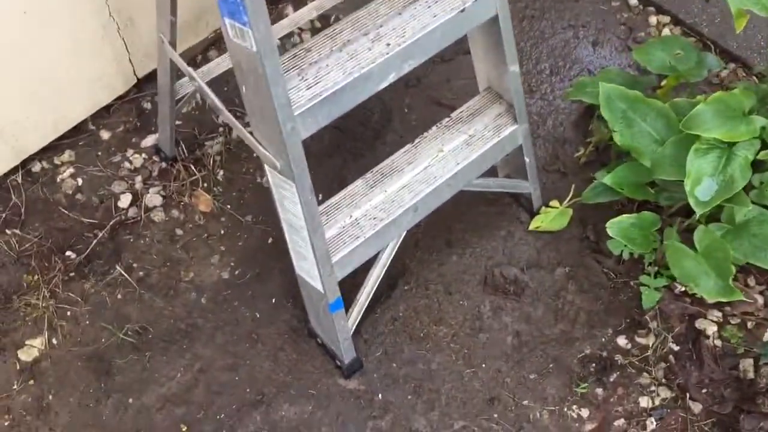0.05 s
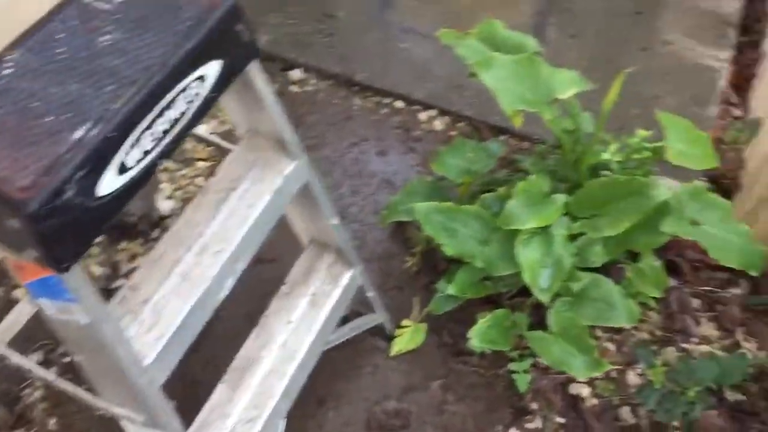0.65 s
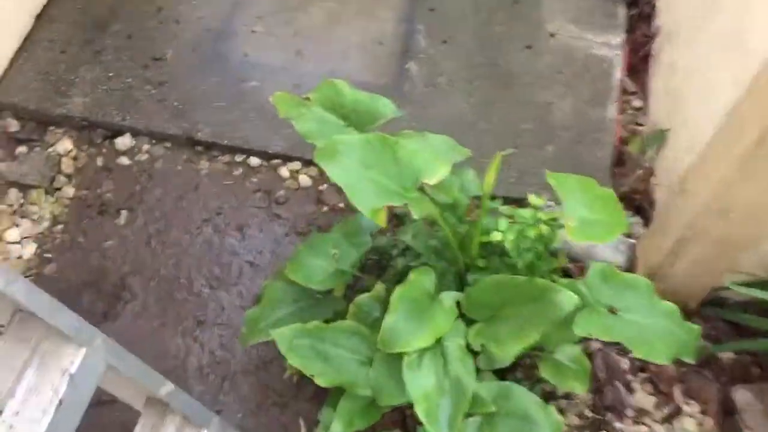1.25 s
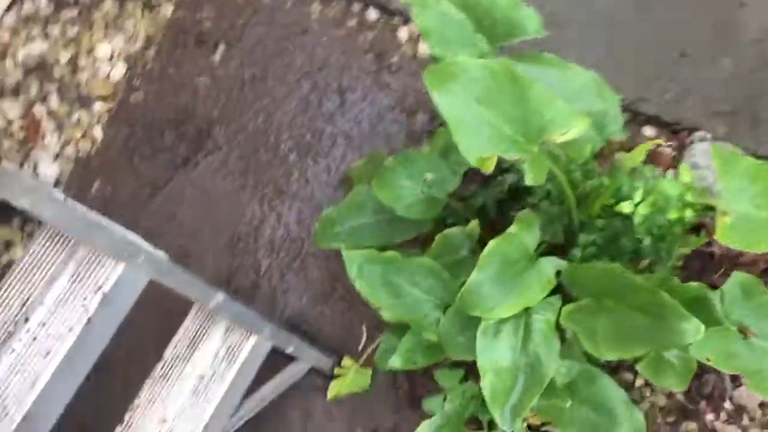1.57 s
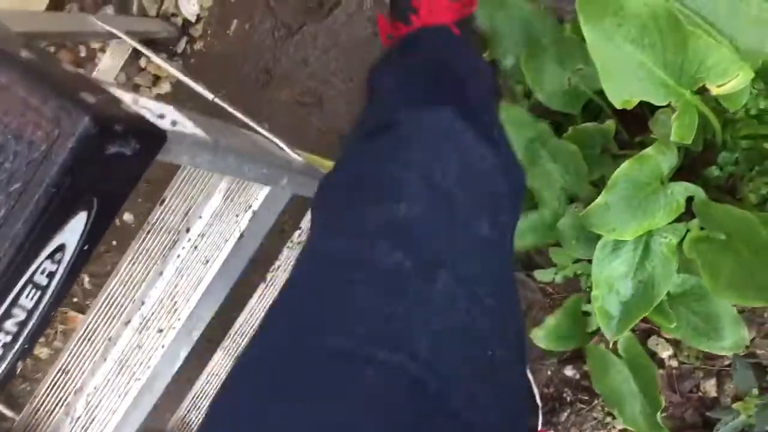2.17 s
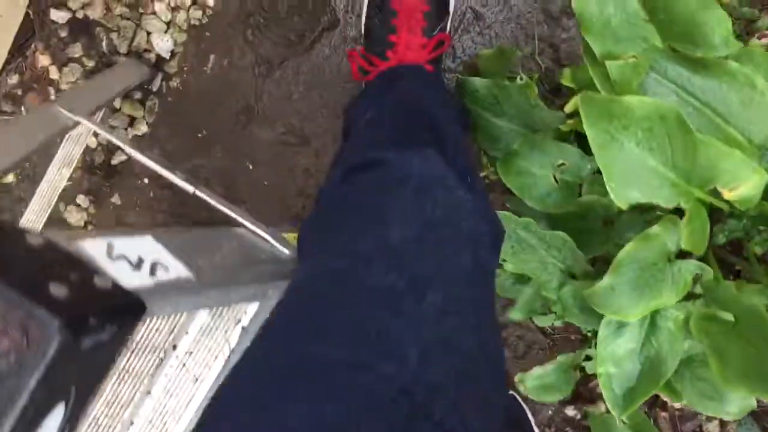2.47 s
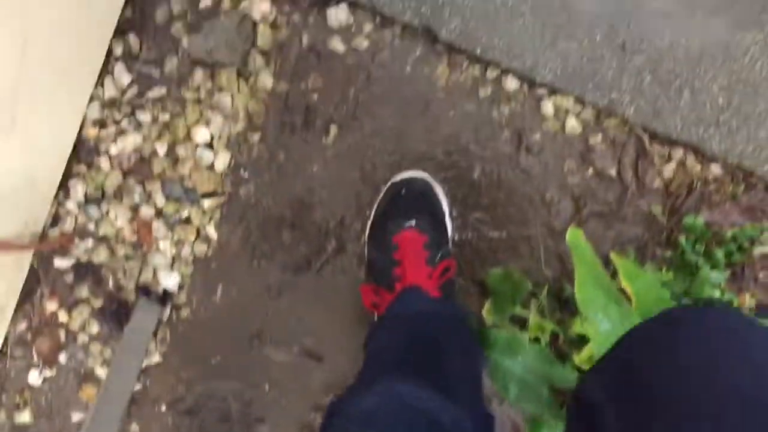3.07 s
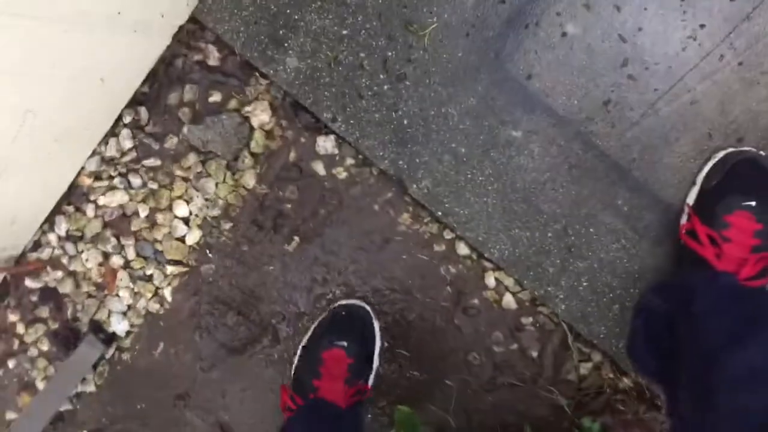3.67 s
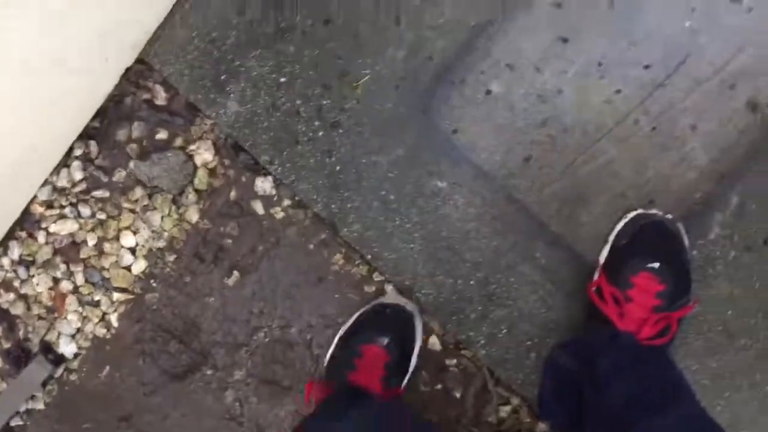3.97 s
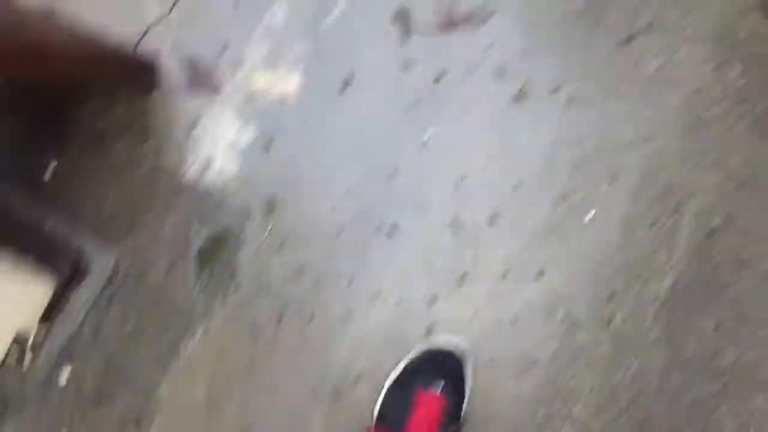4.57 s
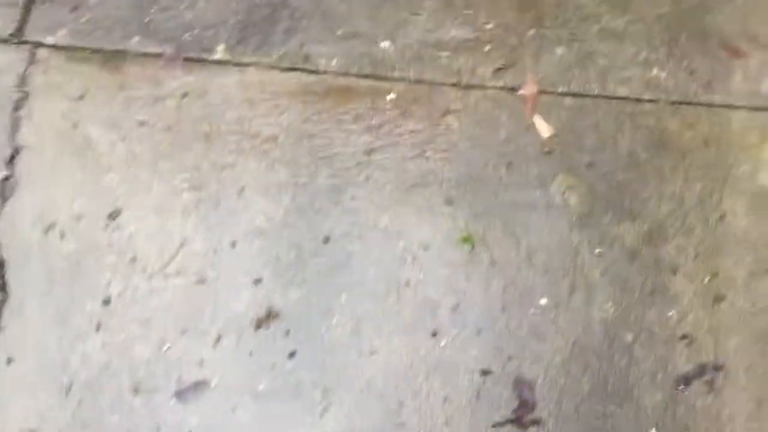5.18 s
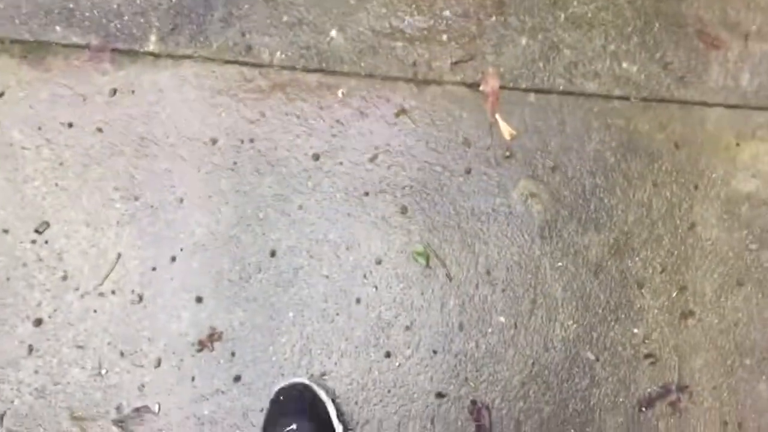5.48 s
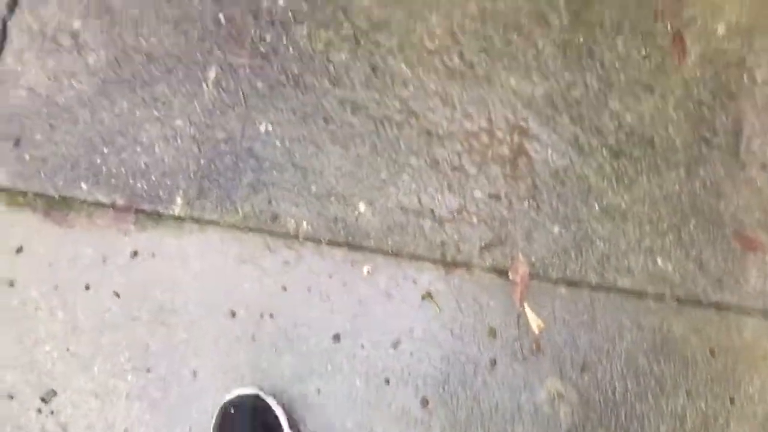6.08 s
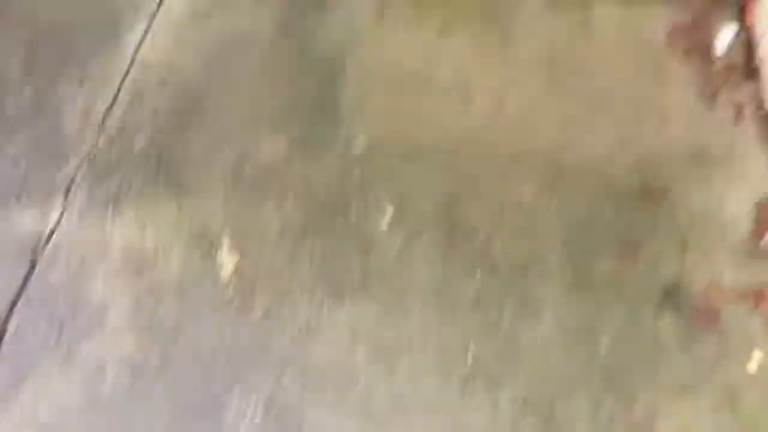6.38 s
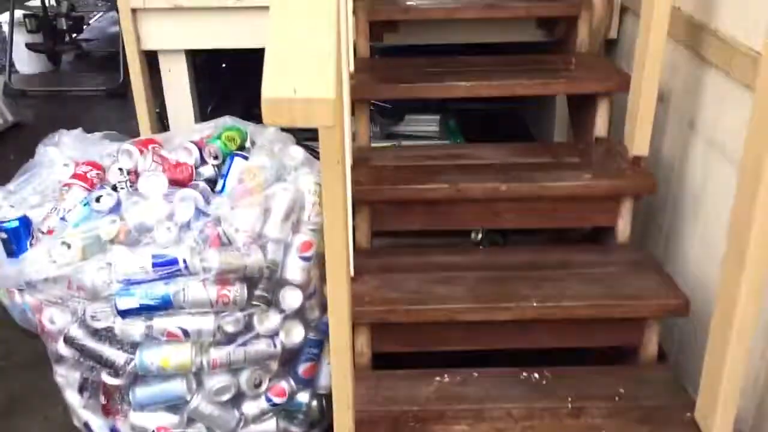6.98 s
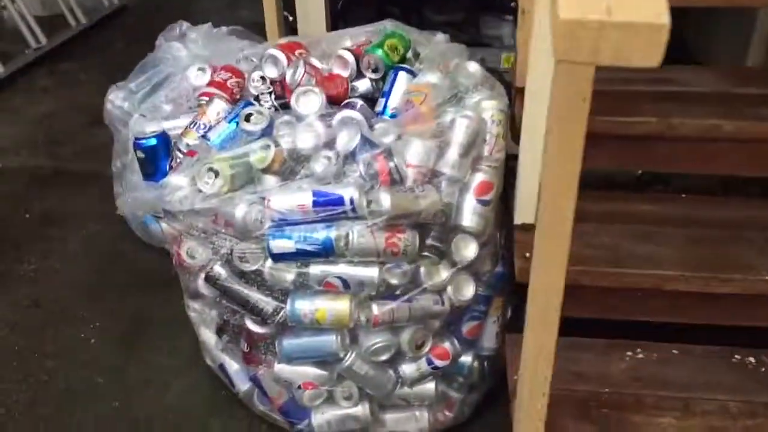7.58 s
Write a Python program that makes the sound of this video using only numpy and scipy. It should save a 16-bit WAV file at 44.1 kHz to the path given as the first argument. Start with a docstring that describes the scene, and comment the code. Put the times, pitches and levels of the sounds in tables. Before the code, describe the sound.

A faint, low hum of distant traffic and engines runs throughout in an outdoor yard. For the first two seconds, close sneakers make very soft scuffs on wet mud, with tiny pebble clicks and light brushing of trousers and leaves. Gentle steps land around 2.1 seconds, and a sharper gritty crunch comes at 2.6. Quieter wet steps, taps and rustles continue until about 3.8, then thin out to faint shuffles, with a tiny squeak near 5.3. The loudest sounds follow: three quick stamps on wet concrete at about 5.4, 5.6 and 6.0 seconds, each a heel smack running into a short, rough scrape with snapping grit, the second scrape the longest. Nearby walls add a brief reflection. Afterwards only soft scuffs remain, with a faint high rasp around 7 seconds and a last light shuffle and small squeak near 7.4.

```python
"""A yard beside a house. Someone in sneakers steps over wet mud and grit, brushing past leaves,
then stamps and scrapes the soles three times on wet concrete. Friction makes a hiss full of tiny
ringing grains; impacts make damped bursts, and pebbles click under the shoes. The walls reflect
the footsteps, and far traffic hums behind it all, with a faint high rasp near the end."""
import sys
import numpy as np
from scipy import signal
from scipy.fft import rfft, irfft, next_fast_len
from scipy.io import wavfile
from scipy.ndimage import uniform_filter1d, map_coordinates

SR = 44100
rng = np.random.default_rng(int(sys.argv[2]) if len(sys.argv) > 2 else 0)


def wrap_up_sound(samples):
    """Save the sound to the file named by the first command line argument, as 16-bit audio."""
    columns = np.atleast_2d(samples).T
    # keep every value between -1 and 1, then stretch to whole-number steps
    tamed = np.clip(columns, -1, 1)
    steps = np.round(tamed * 32767).astype(np.int16)
    wavfile.write(sys.argv[1], SR, steps)


N = 345744

# wet grit squeezed under a sole: start_s, rise_s, length_s, level_db, treble_db
WET_STEPS = [(.14, 0.023, 0.066, -66.5, 31), (1.272, 0.016, 0.08, -55, 13),
             (1.323, 0.0027, 0.0052, -41, 20), (2.572, 0.0026, 0.0037, -42.5, 9),
             (2.586, 0.0018, .02, -44, -5.5), (2.604, 0.01, 0.016, -25, -1.5), (2.64, .005, 0.078, -58, -2),
             (2.745, .002, 0.0072, -35, -1), (3.329, .004, .07, -43.5, -10), (3.41, .003, 0.0056, -47, -3),
             (3.66, .003, 0.032, -62.5, 5.5), (3.695, .006, 0.036, -48, -6),
             (3.739, .002, 0.0067, -40, -0.5), (3.749, 0.003, 0.0077, -37.5, -10)]


def amp(db):
    """Decibels to amplitude ratio."""
    return 10 ** (np.asarray(db) / 20)


def unit(x):
    """Normalisation to rms 1."""
    return x / np.sqrt(np.mean(x ** 2) + 1e-20)


def along(points, hz):
    """Interpolation of (frequency, value) points on a log frequency axis."""
    f, v = np.transpose(points)
    return np.interp(np.log(hz + 1), np.log(f + 1), v)


def hump(hz, centre_hz, slope_db):
    """Band-pass response in dB, its skirts falling by slope_db an octave."""
    return -slope_db * (np.hypot(np.log2((hz + 1) / centre_hz), .5) - .5)


def wobble(rate):
    """Smooth random modulation with rate knots a second."""
    return map_coordinates(rng.standard_normal(int(N * rate / SR) + 4), [np.arange(N) * rate / SR])


def add(track, s, sound):
    """Superposition of a sound on the track at s seconds."""
    part = track[max(round(s * SR), 0):][:len(sound)]
    part += sound[:len(part)]


def colour(x, gain_db, size=4096):
    """Minimum-phase filter with the response gain_db(hz)."""
    cepstrum = irfft(np.log(amp(gain_db(np.fft.rfftfreq(size, 1 / SR))) + 1e-6))
    cepstrum[1:size // 2] *= 2
    cepstrum[size // 2 + 1:] = 0
    return signal.fftconvolve(x, irfft(np.exp(rfft(cepstrum))))[:len(x)]


def patchy(x, depth_db, size):
    """Random modulation band by band; a larger size gives narrower, longer patches."""
    z = signal.stft(x, nperseg=size)[2]
    field = uniform_filter1d(rng.standard_normal(z.shape), size=3, axis=0)
    field = uniform_filter1d(field, size=4, axis=1)
    return unit(signal.istft(z * amp(depth_db * unit(field)), nperseg=size)[1][:len(x)])


def burst(t60_s, gain_db):
    """A damped impact: filtered noise in exponential decay, with peak 1."""
    t = np.arange(SR // 8) / SR
    puff = colour(rng.standard_normal(len(t)) * amp(-60 * t / t60_s), gain_db)
    return puff / np.abs(puff).max()


def drone(swells, hz, waver_db, drift_hz, drift_rate):
    """A randomly modulated tone under Gaussian swells, 10 dB down at rise_s before and fall_s after."""
    t = np.arange(N) / SR
    db = np.max([top_db - 10 * ((t - s) / np.where(t < s, rise_s, fall_s)) ** 2
                 for s, top_db, rise_s, fall_s in swells], axis=0)
    phase = 2 * np.pi * np.cumsum(hz + drift_hz * wobble(drift_rate)) / SR
    return np.sqrt(2) * amp(db + waver_db * wobble(8.2)) * np.sin(phase)


def traffic():
    """Far vehicles sum incoherently to a shifting rumble under a nearly steady wash."""
    # spectra: frequency_hz, level_db
    rumble_spectrum = [(13, -54.5), (22, -10.5), (36, -12), (54, 2), (106, -3), (178, -10), (241, -15.5),
                       (300, -18.5), (390, -35), (660, -120)]
    wash_spectrum = [(150, -22.5), (250, -4.5), (429, -7.5), (586, -6.5), (890, -2), (1140, -3.5),
                     (1420, -7), (2020, -9), (2240, -12.5), (3170, -15), (4990, -21.5), (7570, -25.5),
                     (12300, -30), (13200, -26), (16000, -38.5)]
    # course of the rumble: time_s, level_db
    rumble_levels = [(0, -56.5), (.35, -57), (.9, -59.5), (1.25, -58.5), (1.65, -59), (2.3, -55.5),
                     (3.3, -56.5), (4.5, -57), (5.6, -59), (6.2, -61), (6.7, -58), (7.35, -57), (7.84, -63)]
    rumble_db = np.interp(np.arange(N) / SR, *np.transpose(rumble_levels))
    rumble = patchy(rng.standard_normal(N), depth_db=3.5, size=4096)
    rumble = unit(colour(rumble, lambda hz: along(rumble_spectrum, hz)))
    wash = patchy(rng.standard_normal(N), depth_db=3, size=1024)
    wash = unit(colour(wash, lambda hz: along(wash_spectrum, hz)))
    return (rumble * amp(rumble_db + 2 * wobble(13))
            + wash * amp(-62.5 + .24 * wobble(4.1) + .45 * wobble(25)))


def engines():
    """Periodic firing gives low tones: one engine idles, one climbs as it pulls away, one flutters."""
    # swells of each engine: peak_s, level_db, rise_s, fall_s
    idle_swells = [(3.3, -55, .65, 0.73), (4.95, -52, 1.25, 0.78)]
    leaving_swells = [(.35, -57, .5, 0.3)]
    passing_swells = [(3.65, -60, 0.47, .8)]
    idle = drone(idle_swells, hz=58, waver_db=1.5, drift_hz=1.55, drift_rate=11)
    climbing_hz = 113 + 40 * np.arange(N) / SR
    leaving = drone(leaving_swells, climbing_hz, waver_db=4.5, drift_hz=7.3, drift_rate=34)
    passing = drone(passing_swells, hz=196.3, waver_db=1.5, drift_hz=35, drift_rate=170)
    flutter = unit(amp(4 * wobble(22)))
    return idle + leaving + passing * flutter


def rasp():
    """Fast random frequency modulation spreads two tones into faint, narrow bands of hiss."""
    # swells of each band: peak_s, level_db, rise_s, fall_s
    lower_swells = [(7.0, -63.5, 0.45, 0.1)]
    upper_swells = [(7.02, -65.5, 0.1, 0.063)]
    return (drone(lower_swells, hz=3480, waver_db=0, drift_hz=222, drift_rate=1100)
            + drone(upper_swells, hz=4250, waver_db=1, drift_hz=271, drift_rate=620))


def yard(x, early_db, tail_db):
    """Early reflections off ground and walls, and a diffuse tail; both change as the walker moves."""
    # reverberation time: frequency_hz, t60_s
    decay_times = [(150, 0.26), (1000, 0.28), (3000, 0.41), (8000, 0.33), (15000, 0.61)]
    out, hop = np.zeros(N), SR // 2
    for start in range(0, N, hop):
        hz, t, z = signal.stft(rng.standard_normal(SR // 3), SR, nperseg=256)
        tilt_db = along([(2500, -1.5), (12000, -4)], hz)[:, None]
        fade_db = -60 * t / along(decay_times, hz)[:, None]
        tail = signal.istft(z * amp(fade_db + tilt_db), SR, nperseg=256)[1]
        tail = np.pad(tail, (SR // 100, 0))
        walls = np.zeros(len(tail))
        walls[rng.integers(SR // 500, SR // 50, size=12)] = rng.standard_normal(size=12)  # 2-20 ms
        response = amp(early_db) * walls / np.linalg.norm(walls)
        response += amp(tail_db) * tail / np.linalg.norm(tail)
        add(out, start / SR, signal.fftconvolve(x[start:start + hop], response))
    return out


def grit(count, rate, spread_db, hiss, ring_t60_s):
    """Shot noise: rate grains a second, uneven in size, each ringing at its own pitch over a hiss."""
    grain_count = int(np.clip(rate * count / SR, 1, 2000))
    when, pitch, size = rng.random((2000, 3))[:grain_count].T[:, :, None]
    k = np.arange(SR // 300)
    ping_hz = 400 + 15500 * pitch
    strength = amp(-spread_db * np.log(size + .03))
    pings = np.sin(np.float32(2 * np.pi * ping_hz * k / SR)) * amp(-60 * k / SR / ring_t60_s) * strength
    samples = (when * count).astype(int) + k
    grains = np.bincount(samples.ravel(), pings.ravel(), count)[:count]
    return unit(unit(grains) + hiss * rng.standard_normal(count))


def friction(rows, body_db, release_t60_s, sag_db_per_s, brighten_db_per_s, bass_db,
             judder_db, patchy_db, **grain):
    """Sliding friction: each stroke presses, thins as it slows, and lifts; stick-slip makes it judder."""
    out, t = np.zeros(N), np.arange(SR // 3) / SR
    judder = amp(judder_db * wobble(220))
    treble_band = signal.butter(2, 4000, "highpass", fs=SR, output="sos")
    for s, rise_s, length_s, db, treble_db in rows:
        slid_s = np.maximum(np.minimum(t, length_s) - rise_s, 0)
        release_db = -60 * np.maximum(t - length_s, 0) / release_t60_s
        pressure = np.minimum(t / max(rise_s, 1e-4), 1) * amp(release_db - sag_db_per_s * slid_s)
        tilt = [(600, bass_db), (2200, .0024), (8000, treble_db)]
        roughness = patchy(grit(len(t), **grain), patchy_db, size=1024)
        rubbing = unit(colour(roughness, lambda hz: body_db(hz) + along(tilt, hz)))
        thinning = (amp(brighten_db_per_s * slid_s) - 1) * signal.sosfiltfilt(treble_band, rubbing)
        add(out, s, amp(db) * pressure * (rubbing + thinning))
    return out * judder


def shuffles():
    """Light friction of shoes, trousers and leaves gives a dull, smooth hiss."""
    # brushing strokes: start_s, rise_s, length_s, level_db, treble_db
    strokes = [(.11, 0.017, 0.044, -58, -32), (1.3, 0.027, 0.065, -60.5, -11),
               (1.455, 0.0081, 0.014, -56, 1.5), (1.843, 0.023, 0.031, -51, -2.5),
               (1.905, 0.015, 0.073, -50.5, 0), (2.015, .004, .1, -52, 3), (3.07, .11, 0.17, -56, 13),
               (3.215, 0.0046, 0.021, -49, 6.5), (3.245, 0.01, 0.065, -46.5, 4.5), (4, .027, 0.063, -59, 0),
               (4.57, 0.015, 0.062, -62, 2), (5.12, .05, 0.049, -64, 5.5), (5.36, 0.052, .055, -54.5, 8.5),
               (6.335, 0.006, 0.0251, -58.5, -11), (6.895, 0.0076, 0.056, -54.5, -6.5),
               (7.35, 0.028, 0.055, -51.5, -3.5)]
    # rubbed cloth: frequency_hz, level_db
    spectrum = [(60, 1.5), (300, 3), (700, 0), (1800, -0.5), (3200, -6), (5000, -12), (7000, -16),
                (10500, -22), (13000, -19.5), (16000, -26.5)]
    return friction(strokes, lambda hz: along(spectrum, hz), release_t60_s=.21, sag_db_per_s=69.5,
                    brighten_db_per_s=6, bass_db=-1.5, judder_db=.47, patchy_db=4,
                    rate=2200, spread_db=3, hiss=2.7, ring_t60_s=.0037)


def squelches():
    """Granular friction: wet grit shears under the sole with a bright crackle."""
    # wet grit: frequency_hz, level_db
    spectrum = [(60, -43.5), (400, -7.5), (700, -9.5), (1000, -3.5), (1500, -4), (2200, -4.5), (3600, 1.5),
                (5000, -4.5), (6500, 0), (10000, -6), (12500, -7), (16000, -10.5)]
    return friction(WET_STEPS, lambda hz: along(spectrum, hz), release_t60_s=.032, sag_db_per_s=23.5,
                    brighten_db_per_s=14, bass_db=-2, judder_db=2.3, patchy_db=3,
                    rate=3000, spread_db=4.5, hiss=.85, ring_t60_s=.0047)


def squeaks():
    """Small wet squeaks are damped chirps, their jittery pitch falling exponentially."""
    # squeaks: start_s, peak_db, start_hz, end_hz, life_s
    chirps = [(5.278, -43, 2270, 1195, 0.0025), (7.374, -52.5, 2790, 2223, 0.02)]
    out, t = np.zeros(N), np.arange(SR // 8) / SR
    for s, db, start_hz, end_hz, life_s in chirps:
        hz = end_hz + (start_hz - end_hz) * np.exp(-t / life_s) + 700 * rng.standard_normal(len(t))
        envelope = amp(db) * t / life_s * np.exp(1 - t / life_s)
        add(out, s, envelope * np.sin(2 * np.pi * np.cumsum(hz) / SR))
    return out


def pebbles():
    """Struck stones resonate; damping by the mud makes each ring short and broad."""
    # stone clicks: start_s, peak_db, ring_hz
    clicks = [(0.062, -45, 5670), (.52, -53, 6400), (1.431, -48, 9000), (1.51, -50, 4770),
              (1.7, -46, 10000), (1.895, -45, 13500), (2.821, -43.5, 4800), (2.866, -44.5, 5500),
              (2.945, -49, 8500), (4.132, -49.5, 3820), (4.459, -49.5, 10900)]
    # one more stone settles after each wet step
    settling = [(step[0] + .27 * wait, -57.5, 6600 * 2 ** (pitch - .5))
                for step, (wait, pitch) in zip(WET_STEPS, rng.random((len(WET_STEPS), 2)))]
    out = np.zeros(N)
    for s, db, ring_hz in clicks + settling:
        stone_db = lambda hz: hump(hz, ring_hz, slope_db=17.5) + 12 / (1 + ((hz - ring_hz) / 450) ** 2)
        add(out, s, amp(db) * burst(.029, stone_db))
    return out


def cracks():
    """Brittle fracture: coarse grains snap under the sole in broadband clicks."""
    # breaking grains: start_s, peak_db
    fractures = [(2.615, -23), (2.625, -17.5), (3.354, -34), (3.39, -43), (5.422, -14.5), (5.48, -14.5),
                 (5.493, -20), (5.5056, -16.5), (5.722, -17), (5.779, -22.5), (6.087, -26)]
    out = np.zeros(N)
    for s, db in fractures:
        add(out, s, amp(db) * burst(.015, lambda hz: hump(hz, centre_hz=2530, slope_db=12.5)))
    return out


def ripple_db(hz):
    """Spectral ripple: narrow peaks and dips that colour the scrapes and slaps."""
    # peaks and dips: centre_hz, width_hz, lift_db
    peaks = [(664, 220, 8.5), (1034, 80, 4), (1200, 80, -1), (1330, 70, 1), (1790, 90, -2.5),
             (1970, 80, 1.5), (2080, 110, 6), (2390, 100, 3.5), (2730, 190, -2), (3330, 140, 2.5),
             (4000, 240, 1.5)]
    return sum(db / (1 + (2 * (hz - centre) / width) ** 2) for centre, width, db in peaks)


def footfalls():
    """Impacts of sole and heel make damped bursts; the body's weight follows each heel as a thud."""
    # rubber slaps the ground: start_s, peak_db, centre_hz
    slaps = [(.06, -52.5, 2600), (1.302, -42, 2900), (1.325, -47, 1200), (2.062, -35.5, 2020),
             (2.085, -37, 1790), (2.088, -39.5, 500), (2.106, -39.5, 2000), (2.28, -45.5, 2500),
             (2.586, -37, 900), (2.606, -31, 1490), (2.748, -31, 2740), (2.812, -39.5, 1700),
             (3.181, -44, 1280), (3.251, -37.5, 624), (3.514, -35.5, 1370), (3.529, -39, 790),
             (3.751, -30, 1760), (4.559, -46, 980), (5.173, -45, 890), (5.42, -15, 2600),
             (5.446, -16, 1800)]
    # heel strikes: start_s, smack_db, thud_db
    heels = [(3.248, -41, -39), (5.4111, -19, -29), (5.633, -19.5, -37.5), (6.03, -30.5, -44)]
    out, thud_lag_s = np.zeros(N), .0032
    for s, db, centre_hz in slaps:
        slap = burst(.04, lambda hz: hump(hz, centre_hz, slope_db=18) + .5 * ripple_db(hz))
        add(out, s, amp(db) * slap)
    for s, smack_db, thud_db in heels:
        smack = burst(.012, lambda hz: hump(hz, centre_hz=895, slope_db=9.5) + .5 * ripple_db(hz))
        thud = burst(.065, lambda hz: hump(hz, centre_hz=118.7, slope_db=20))
        add(out, s, amp(smack_db) * smack)
        add(out, s + thud_lag_s, amp(thud_db) * thud)
    return out


def scrapes():
    """Hard friction of rubber on concrete gives a loud, gritty noise with narrow peaks and dips."""
    # dragged soles: start_s, rise_s, length_s, level_db, treble_db
    strokes = [(5.414, 0.0058, 0.083, -22, -1), (5.633, .043, 0.17, -27.5, 0),
               (6.025, 0.0072, .056, -24.5, -1)]
    # scraped concrete: frequency_hz, level_db
    spectrum = [(40, -21), (150, -11.5), (320, -10), (560, -4.5), (880, -4), (1150, 3), (2200, 2.5),
                (3500, 0.5), (4800, -7.5), (6300, -4), (8500, -11), (10400, -17), (12000, -15),
                (16000, -22.5)]
    return friction(strokes, lambda hz: along(spectrum, hz) + ripple_db(hz), release_t60_s=.18,
                    sag_db_per_s=107, brighten_db_per_s=35.5, bass_db=1.5, judder_db=1.5, patchy_db=2,
                    rate=5000, spread_db=4, hiss=1, ring_t60_s=.0024)


def scene():
    """Superposition of the walk, its reflections and the background, in mono."""
    scraping = scrapes()
    steps = squelches() + shuffles() + footfalls() + cracks() + pebbles() + squeaks()
    echoes = yard(steps, early_db=-12, tail_db=-17.5)
    # the slab lies between walls, so the scrapes reflect more strongly
    echoes += yard(scraping, early_db=-10.5, tail_db=-17)
    return (steps + scraping + echoes + traffic() + engines() + rasp())[None]


def record(dry):
    """Band limiting: the microphone sheds the deepest bass and passes nothing above top_hz."""
    bass_hz, top_hz = 34, 15950
    thin = signal.sosfilt(signal.butter(3, bass_hz, "highpass", fs=SR, output="sos"), dry)
    size = next_fast_len(N + SR // 2)
    passband = np.fft.rfftfreq(size, 1 / SR) < top_hz
    return irfft(rfft(thin, size) * passband, size)[:, :N]


dry = scene()
out = record(dry)
wrap_up_sound(out)
```